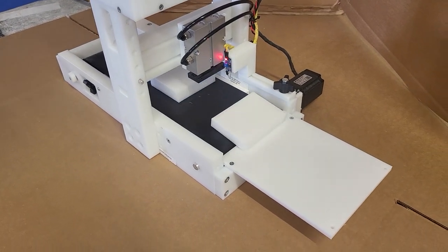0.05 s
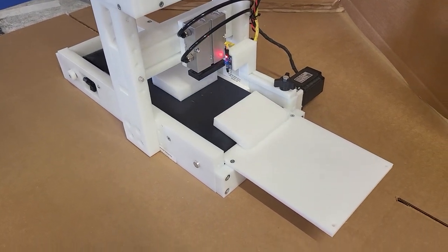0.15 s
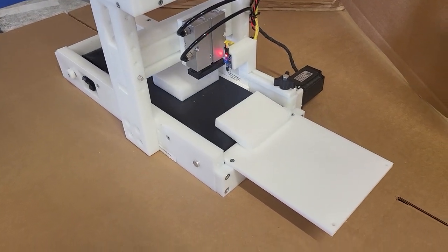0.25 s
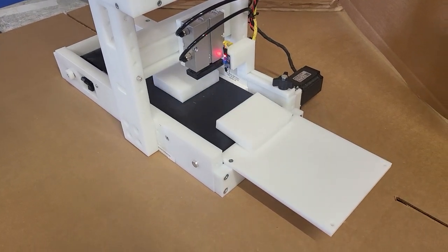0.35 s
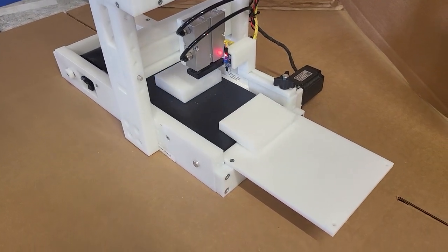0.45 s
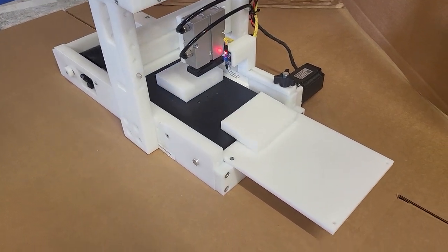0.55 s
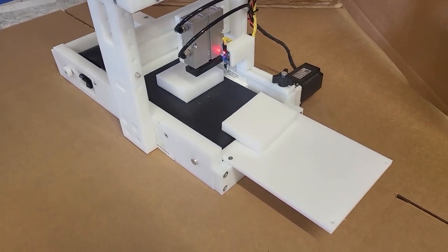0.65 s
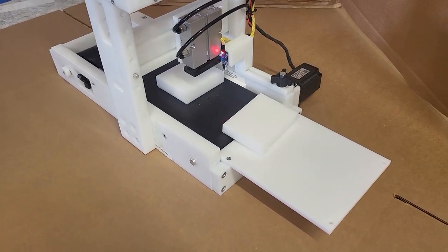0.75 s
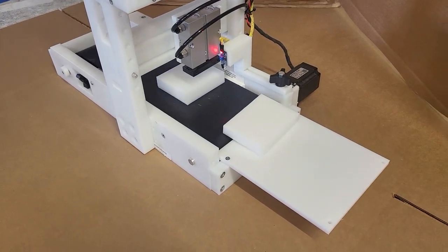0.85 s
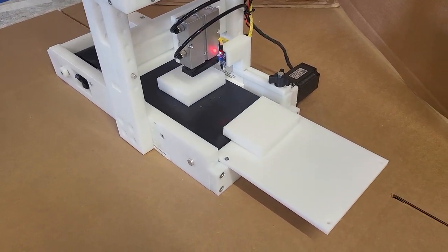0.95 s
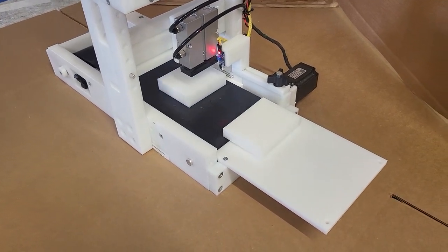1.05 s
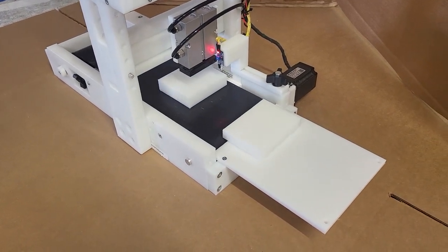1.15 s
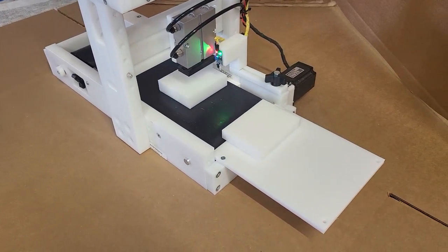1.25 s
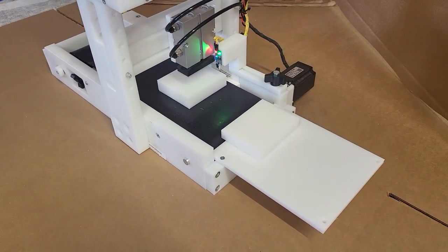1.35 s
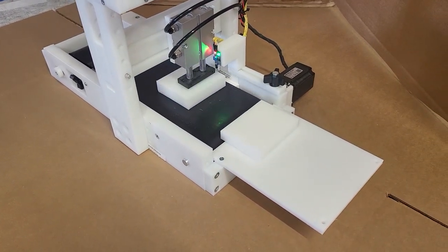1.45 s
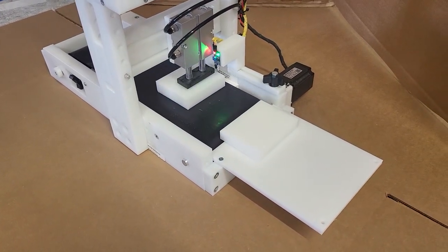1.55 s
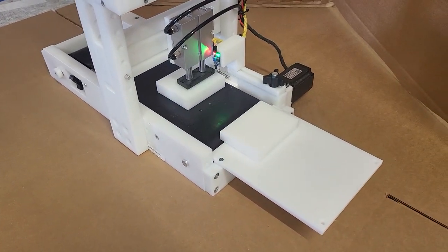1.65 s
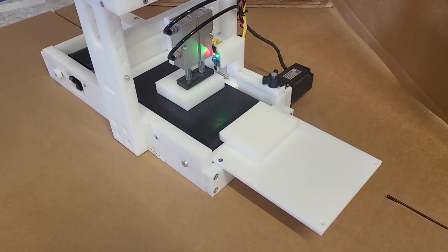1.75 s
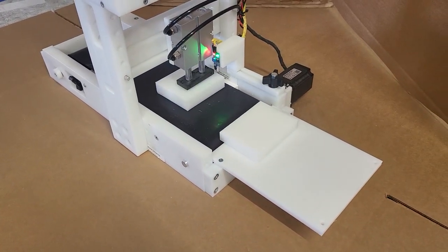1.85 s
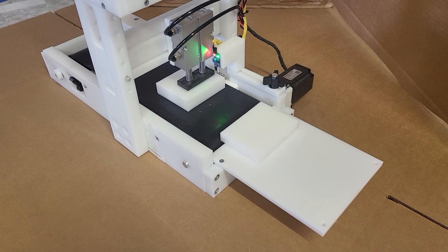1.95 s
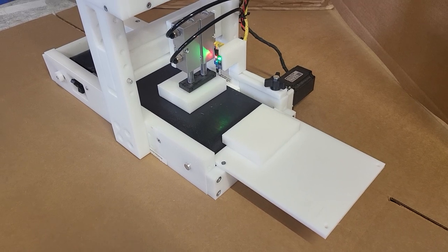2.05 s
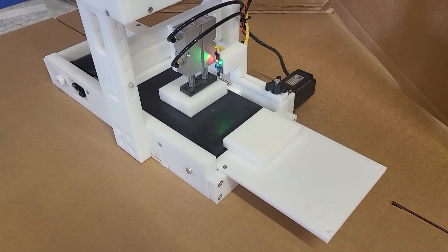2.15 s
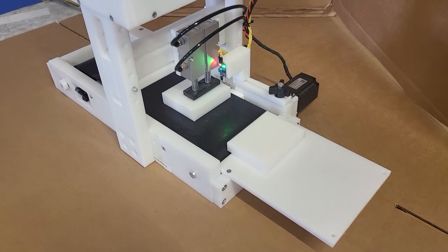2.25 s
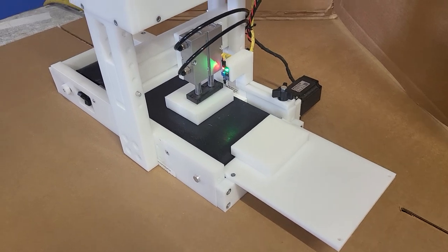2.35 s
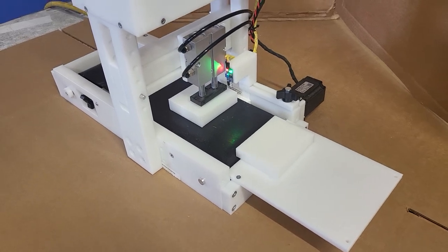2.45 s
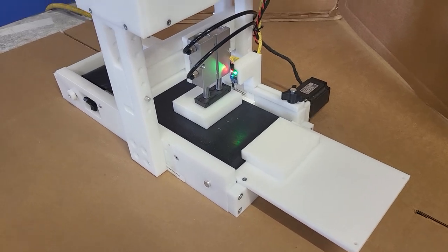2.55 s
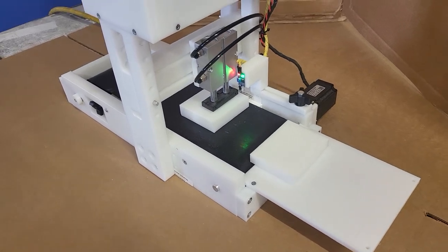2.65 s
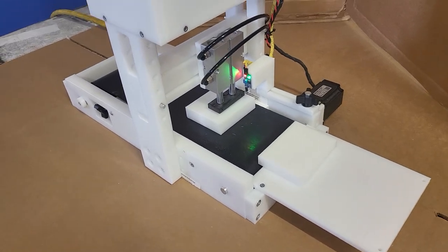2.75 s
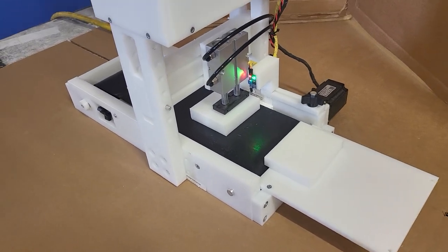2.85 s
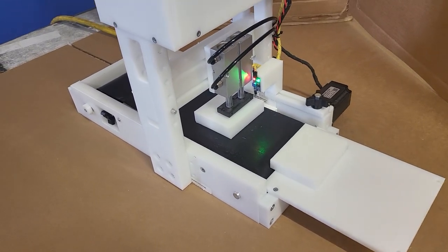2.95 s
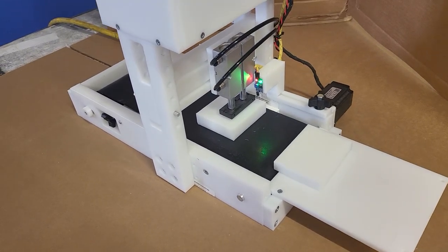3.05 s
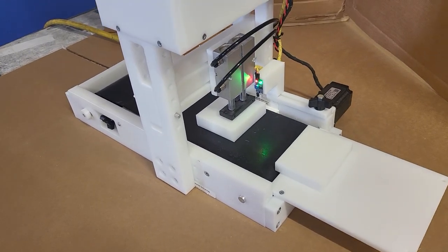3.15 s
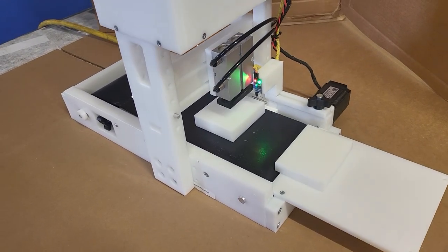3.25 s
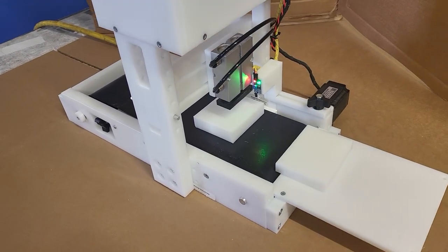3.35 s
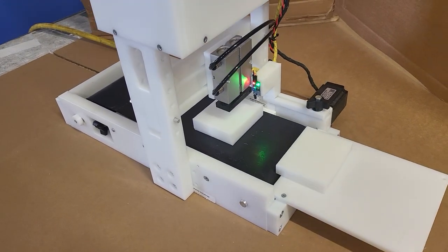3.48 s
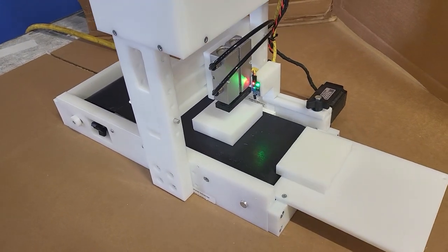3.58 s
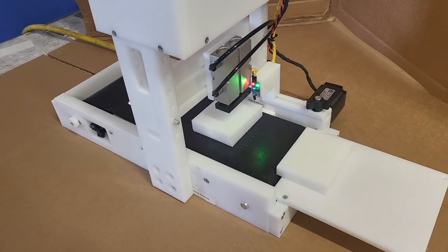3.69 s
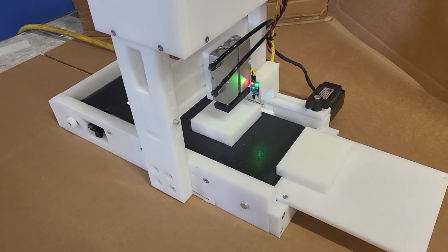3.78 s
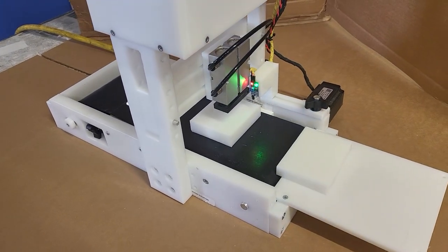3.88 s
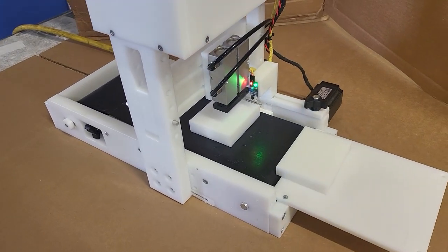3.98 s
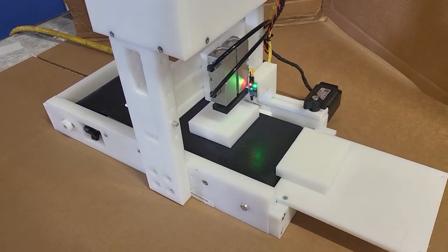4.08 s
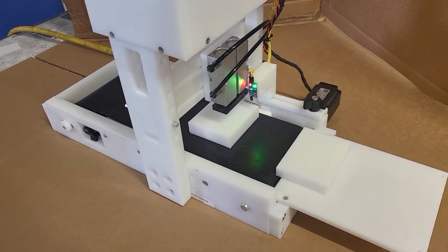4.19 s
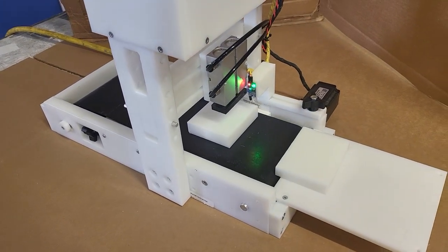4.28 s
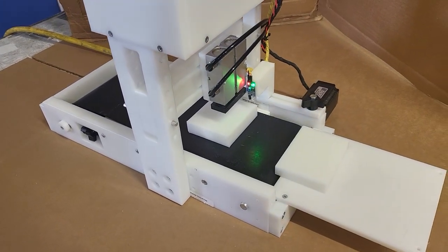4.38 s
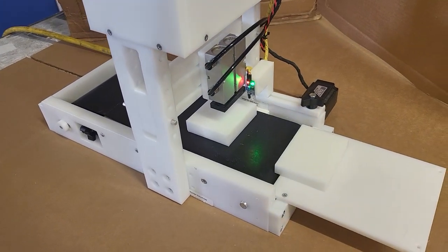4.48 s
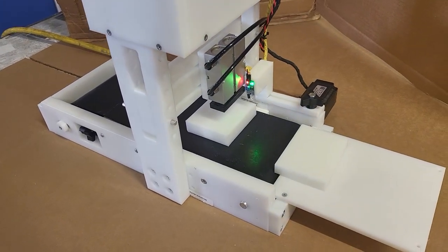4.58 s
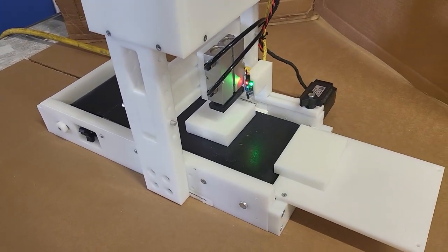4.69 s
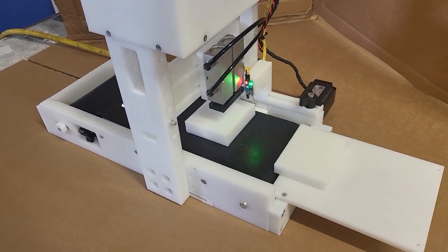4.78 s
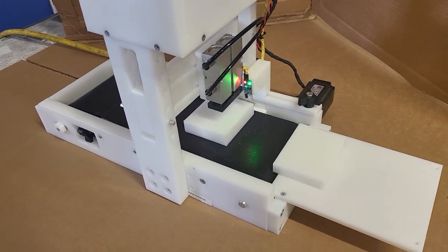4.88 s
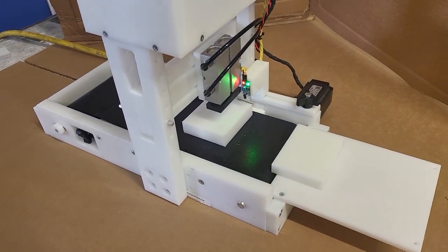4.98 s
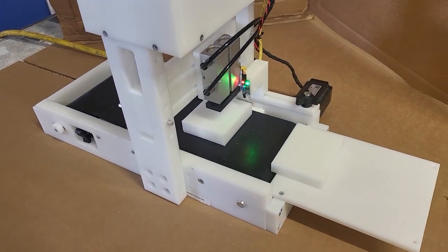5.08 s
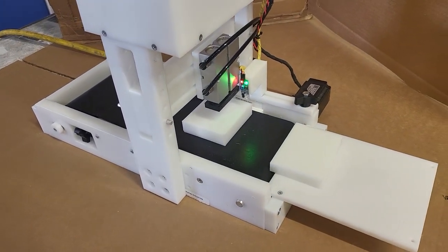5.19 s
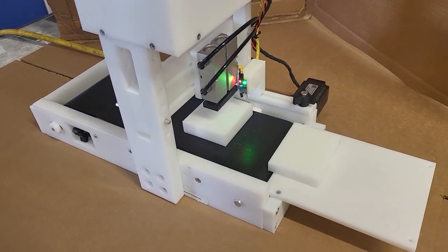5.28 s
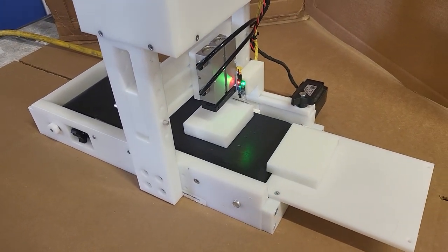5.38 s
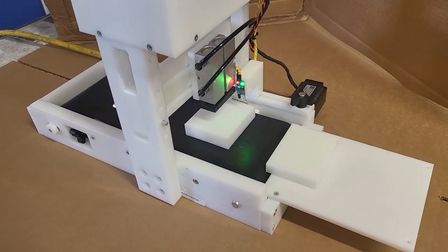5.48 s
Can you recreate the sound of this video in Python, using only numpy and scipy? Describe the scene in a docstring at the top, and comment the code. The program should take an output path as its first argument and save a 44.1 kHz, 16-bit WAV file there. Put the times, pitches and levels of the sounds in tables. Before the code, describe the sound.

Close stereo sound of a tabletop stamping machine: plastic clatter at once, belt whine and rub, then a stop. A hard pneumatic clack with an air burst follows, then hissing with a faint plastic tick or two, then a second thumping stroke as the piston returns. Thin air hiss, low hum and room rumble continue; the conveyor starts again softly. Short workshop echoes.

```python
"""Pneumatic stamping machine on a workshop table

A plastic block clatters onto the belt; its knocks are short noise bursts over ringing modes.
The conveyor, wavering tones over a rubbing noise, stops; a valve clicks and coloured noise blasts out.
The cylinder kicks and slams down, then back up: clacks and decaying modes; later the belt restarts.
An air leak hisses throughout, its colour turning as the listener moves, over hum, fan and room rumble.
"""
import sys
import numpy as np
from scipy import signal
from scipy.fft import rfft, irfft, next_fast_len
from scipy.io import wavfile

SR = 44100
rng = np.random.default_rng(int(sys.argv[2]) if len(sys.argv) > 2 else 0)


def generate_wav(signal):
    """Clip the signal to [-1, 1] and save it as 16-bit WAV at the path in sys.argv[1]."""
    frames = np.transpose(np.atleast_2d(signal))
    scaled = np.clip(frames, -1, 1) * 32767
    pcm = np.round(scaled).astype(np.int16)
    wavfile.write(sys.argv[1], SR, pcm)


N = 243866
TIME = np.arange(N) / SR


def amp(db):
    """Decibels to gain."""
    return 10 ** (np.asarray(db) / 20)


def unit(x):
    """Scales to rms 1."""
    return x / np.sqrt(np.mean(x ** 2) + 1e-20)


def read(points, hz):
    """Reads a curve on a log-frequency axis."""
    f, value = np.transpose(points)
    return np.interp(np.log(hz + 1), np.log(f + 1), value)


def add(mix, s, sound):
    """Mixes a sound in at time s, cut where the scene ends."""
    part = mix[:, max(round(s * SR), 0):][:, :sound.shape[-1]]
    part += sound[..., :part.shape[-1]]


def pan(db):
    """Left and right gains for a left-minus-right level difference."""
    return np.array([amp(db / 2), amp(-db / 2)]).reshape(2, -1)


def drift(per_s):
    """Slow random wander of rms 1, made by keeping only the lowest frequencies of noise."""
    hz = np.fft.rfftfreq(N, 1 / SR)
    return unit(irfft(rfft(rng.standard_normal(N)) * np.exp(-(hz / per_s) ** 2), N))


# How alike diffuse sound is in the two ears. Each row: frequency in Hz, likeness from 0 to 1.
EAR_LIKENESS = [(40, 0.83), (130, .97), (290, 0.72), (640, 0), (1400, 0), (16000, 0.26)]


def blend(a, b, hz):
    """Stereo spectrum from two independent ones, the right side sharing some of the left."""
    same = read(EAR_LIKENESS, hz)
    return np.array([a, same * a + np.sqrt(1 - same ** 2) * b])


def noise(spectrum):
    """Stereo noise of a given colour and rms 1, alike in both ears mostly in the bass."""
    size = next_fast_len(N)
    hz = np.fft.rfftfreq(size, 1 / SR)
    a, b = rfft(rng.standard_normal((2, size)))
    coloured = blend(a, b, hz) * amp(read(spectrum, hz))
    return unit(irfft(coloured, size)[:, :N])


def tones(lines, speed, waver, flutter):
    """Steady machine tones that waver a little in phase and strength."""
    out = np.zeros((2, N))
    wander, throb = drift(1), drift(3.5)
    for hz, db in lines:
        shift = rng.integers(N)  # each tone reads the shared wander from its own place
        phase = 2 * np.pi * (hz * speed * TIME + rng.random()) + waver * hz * np.roll(wander, shift)
        apart = np.arccos(read(EAR_LIKENESS, hz))
        wave = np.sqrt(2) * np.sin([phase, phase + apart])
        out += amp(db) * wave * (1 + flutter * np.roll(throb, shift))
    return out


def ring(modes, rise, spread, rattle=0., rattle_per_s=70):
    """Decaying modes, roughened where loose parts rattle; the higher ones differ more in phase between ears."""
    t = np.arange(SR * 3 // 4) / SR
    turn = rng.standard_normal((len(modes), 2, 1)) * spread
    smooth = np.exp(-(np.fft.fftfreq(len(t), 1 / SR) / rattle_per_s) ** 2)
    out = 0
    for (hz, db, t60), apart in zip(modes, turn):
        shake = np.fft.ifft(smooth * np.exp(2j * np.pi * rng.random(len(t))))
        swing = np.sqrt(1 - rattle ** 2) + rattle * shake / np.std(shake)
        phase = 2 * np.pi * hz * t + apart * min(hz / 1000, 1)
        out = out + amp(db - 60 * t / t60) * (swing * np.exp(1j * phase)).imag
    return out * (1 - np.exp(-t / rise))


def clack(centre_hz, octaves, decay, scatter=0.12, size=8192):
    """A push and the dense rattle after it, in one broad causal resonance."""
    t = np.arange(size) / SR
    hz = abs(np.fft.fftfreq(size, 1 / SR)) + 1
    hump = -2 * np.log1p((np.log2(hz / centre_hz) / octaves) ** 2 / 3)
    log_gain = hump - np.log1p((hz / centre_hz / 8) ** 2)
    resonance = np.exp(np.conj(signal.hilbert(log_gain)))  # minimum phase: nothing sounds before the push
    a, b = np.fft.fft(scatter * rng.standard_normal((2, size)) * np.exp(-t / decay))
    force = 1 + blend(a, b, hz / 2)  # the 1 is the push itself
    x = np.fft.ifft(force * resonance).real * (1 - t / t[-1]) ** 2
    return x * np.sqrt(decay * SR / np.sum(x ** 2) * 2)


def thump():
    """The short dull push of a part that jerks into motion."""
    return clack(centre_hz=186, octaves=0.39, decay=0.0015)


# How long the shop's tail rings. Each row: frequency in Hz, t60 in seconds.
SHOP_TAIL = [(60, 0.34), (150, 0.78), (400, 0.54), (1400, 0.66), (3000, 0.55), (7000, 0.55), (15000, 0.26)]


def workshop(x, near_db=-8.5, near_t60=0.099, far_db=-17.5, near_low_hz=900, far_low_hz=160):
    """Quick echoes off the table and cardboard, then the faint tail of the shop, all as decaying noise."""
    age = TIME[:SR]
    white = noise([(20, 0), (20000, 0)])[:, :SR]
    hz, t, z = signal.stft(white, SR, nperseg=256)
    z *= amp(-60 * t / read(SHOP_TAIL, hz)[:, None])
    far = signal.istft(z, SR, nperseg=256)[1][:, :SR] * np.clip(age / 0.037, 0, 1)
    near = rng.standard_normal((2, SR)) * amp(-60 * age / near_t60) * (age > .003)
    # small surfaces throw back little bass
    near = signal.sosfilt(signal.butter(2, near_low_hz, "high", fs=SR, output="sos"), near)
    far = signal.sosfilt(signal.butter(2, far_low_hz, "high", fs=SR, output="sos"), far)
    echoes = (amp(near_db) * unit(near) + amp(far_db) * unit(far)) / np.sqrt(SR)
    return x + signal.fftconvolve(x, echoes, axes=1)[:, :N]


# Colour of the room rumble. Each row: frequency in Hz, relative level in dB.
RUMBLE_COLOUR = [(15, -56.5), (25, -16), (65, -10), (120, -6), (147, -12), (188, -24.5), (371, -14),
                 (441, -19.5), (499, -18.5), (554, -27), (614, -22.5), (1600, -28.5), (2080, -70),
                 (3520, -120)]
RUMBLE_DB = -56


def room_rumble():
    """The low bed of the shop: steady noise weighted to the bass."""
    return amp(RUMBLE_DB) * noise(RUMBLE_COLOUR)


# Transformer hum. Each row: frequency in Hz, level in dB.
MAINS_TONES = [(119.95, -51.5), (240, -72)]
# Fan tones. Each row: frequency in Hz, level in dB before the flutter.
FAN_TONES = [(358, -68), (385, -65.5), (500, -75), (622, -77)]


def hum():
    """Nearly steady mains hum and a fan whose tones waver strongly in level."""
    mains = tones(MAINS_TONES, 1, waver=.0003, flutter=.04)
    return mains + tones(FAN_TONES, 1, waver=0.0006, flutter=0.79)


# The listener moving round the machine. Each row: time in seconds, share of the whole way.
LISTENER_WAY = [(0, 0), (1.5, 0.1), (2.2, 0.34), (3.1, 0.53), (4.0, 1), (5.5, 0.99)]
# Colour of the escaping air. Each row: frequency in Hz, relative level in dB.
LEAK_COLOUR = [(900, -21.5), (1500, -16.5), (2200, -10.5), (3050, -12), (3550, -5), (4600, -6), (5750, -2),
               (7000, -2), (7950, 1), (8480, -7), (10500, -5.5), (13000, -7.5), (15600, -7), (16300, -28)]
# Balance of the hiss. Each row: frequency in Hz, left-minus-right level in dB.
LEAK_BALANCE = [(60, -2), (110, -3.5), (200, 2), (380, -1.5), (700, -2), (1290, 0.5), (2380, 1.5),
                (4400, -3), (8120, -2), (15000, -2)]
# Beamed resonances of the leak. Each row: frequency on the beam in Hz, boost on the beam in dB,
# direction as a share of the way, left-minus-right boost in dB.
LEAK_BEAMS = [(5950, 3, 0.65, -6), (6920, 6.5, .1, 8.5), (7520, 7.5, 0.55, 0), (7960, 6, 0.035, -1.5),
              (10130, 3.5, 0.07, -10.5), (14700, 2.5, .95, 11)]
# How much sooner the hiss is heard on the right, at the start and the end of the way [s].
LEAK_RIGHT_LEADS = [0.00013, -.00017]
LEAK_DB = -44.5
LEAK_DIRECT = 0.092  # share of the hiss that reaches both ears straight
BEAM_SPREAD, BEAM_WIDTH = 0.25, 0.025  # share of the way; share of each resonance's frequency
BEAM_GLIDE = 0.12  # rise across a beam, as a share of its frequency per whole way


def leak(echo=0.17, swing=0.246, count=6):
    """Escaping air; the moving listener passes through its beams, and echoes off the frame comb the hiss."""
    hz, t, z = signal.stft(rng.standard_normal((2, N)), SR, nperseg=512)
    hz = hz[:, None]
    way = np.interp(t, *np.transpose(LISTENER_WAY))
    lead = np.interp(way, [0, 1], LEAK_RIGHT_LEADS)
    straight = LEAK_DIRECT * z[0] * np.exp(2j * np.pi * hz * lead)
    z[1] = straight + np.sqrt(1 - LEAK_DIRECT ** 2) * z[1]
    z *= amp(read(LEAK_COLOUR, hz)) * pan(read(LEAK_BALANCE, hz[:, 0]))[:, :, None]
    for centre_hz, db, direction, side_db in LEAK_BEAMS:
        off_beam = way - direction
        facing = np.exp(-(off_beam / BEAM_SPREAD) ** 2)
        peak = np.exp(-((hz / centre_hz - 1 - BEAM_GLIDE * off_beam) / BEAM_WIDTH) ** 2)
        z *= amp(np.multiply.outer([db + side_db / 2, db - side_db / 2], facing * peak))
    for side in z:
        delays = np.geomspace(.0005, .003, count) * rng.uniform(.8, 1.2, count)
        slides = swing * rng.standard_normal(count)  # each delay stretches or shrinks along the way
        comb = 1
        for delay, slide in zip(delays, slides):
            comb = comb + echo * np.exp(2j * np.pi * hz * delay * (1 + slide * way))
        side *= abs(comb)
    return amp(LEAK_DB) * unit(signal.istft(z, SR, nperseg=512)[1][:, :N])


# Conveyor runs. Each row: start in seconds, stop in seconds, level in dB, motor speed as a factor.
CONVEYOR_RUNS = [(-.1, 1.29, 0, 1.0), (5.112, 5.7, -4, 1)]
# Motor whine. Each row: frequency in Hz at speed 1, level in dB before the run's level.
MOTOR_TONES = [(178, -64), (648, -61.5), (1268, -69), (1360, -70.5), (1445, -64.5), (1896, -68.5),
               (2622, -72)]
# Colour of the belt's rub. Each row: frequency in Hz, relative level in dB.
BELT_COLOUR = [(100, 7.5), (180, 2.5), (450, 1), (650, 5), (1000, -3.5), (1450, -3), (3000, -22),
               (5000, -9)]
BELT_DB = -57.5  # before the run's level


def conveyor():
    """The motor whines and the belt rubs, fading in and out at the ends of each run."""
    out = np.zeros((2, N))
    rub = amp(BELT_DB) * noise(BELT_COLOUR)
    for start, stop, db, speed in CONVEYOR_RUNS:
        running = np.clip(np.minimum(TIME - start, stop - TIME) / 0.098, 0, 1)
        whine = tones(MOTOR_TONES, speed, waver=0.00018, flutter=0.06)
        out += amp(db) * running * (rub + whine)
    return out


# Light plastic knocks. Each row: start in seconds, ring level in dB, tick level in dB,
# tick centre in Hz, tick spread in octaves, tick decay in seconds.
PLASTIC_KNOCKS = [(.0045, -34.5, -33, 1210, 0.79, 0.011), (.024, -37, -39.5, 480, 0.69, 0.010),
                  (.069, -35.5, -40, 1200, 0.28, 0.01), (2.152, -69, -41, 1230, 0.54, .0035),
                  (2.505, -74, -60.5, 1220, .6, 0.06)]
# Modes of the plastic block. Each row: frequency in Hz, relative level in dB, t60 in seconds.
BLOCK_MODES = [(191, -6.5, 0.069), (263.3, -12, 0.24), (351, -7.5, 0.25), (409, -7.5, 0.43),
               (649, -6.5, 0.45), (1030, -14, .11), (1056, 0.5, 0.1), (1230, -6, 0.083), (1268, 3, 0.11),
               (2196, -14, 0.11), (2535, -8, 0.082), (3080, -9, 0.06)]


def knocks():
    """Light plastic parts tick and ring: a noisy clack over the block's rattling modes."""
    out = np.zeros((2, N))
    for s, ring_db, tick_db, hz, octaves, decay in PLASTIC_KNOCKS:
        add(out, s, amp(ring_db) * ring(BLOCK_MODES, rise=0.00044, spread=1.0, rattle=0.67))
        add(out, s, amp(tick_db) * clack(hz, octaves, decay))
    return out


def jet(port, lead, direct=0.14):
    """Air noise from one port: part goes straight to both ears, one a moment before the other."""
    left, right = noise(port)
    straight = direct * np.interp(TIME + lead, TIME, left)
    return np.array([left, straight + np.sqrt(1 - direct ** 2) * right])


# Solenoid valve switching. Each row: start in seconds, air spit level in dB, decay of spit and click
# in seconds, click level in dB, spool thump level in dB.
VALVE_SWITCHES = [(1.3767, -23.5, 0.014, -29, -43), (3.1831, -23, 0.02, -37.5, -22)]
# Exhaust blasts, one a stroke. Each row: opening in seconds, opening time in seconds, piston arrival
# in seconds, level in dB, sag by arrival in dB, emptying time in seconds, left-minus-right level in dB
# (of spit and blast).
EXHAUST_BLASTS = [(1.3852, 0.0064, 1.436, -15, -1.5, 0.0073, -2),
                  (3.196, .003, 3.275, -13.9, -3.8, 0.0076, -1)]
# Port that vents on the down stroke. Each row: frequency in Hz, relative level in dB.
DOWN_PORT = [(180, -37.5), (300, -0.5), (611, -9), (746, -19), (1000, -9), (1130, -17), (2380, -14),
             (5010, -6.5), (6970, -8.5), (7580, -4), (8940, -11), (9710, -3), (15700, -5.5)]
# Port that vents on the return. Each row: frequency in Hz, relative level in dB.
RETURN_PORT = [(180, -42), (300, -7), (439, -11.5), (527, -18), (632, -27), (1520, -27.5), (1820, -15),
               (1980, -25.5), (3480, -9), (5350, -9.5), (5810, -6), (7900, -4), (9000, -8.5), (15700, -3.5)]
# How much sooner each port is heard on the right [s].
PORT_RIGHT_LEADS = [6 / SR, -2 / SR]


def exhaust():
    """The valve clicks; air then roars from one port until the piston arrives and the chamber empties."""
    out = np.zeros((2, N))
    strokes = zip(VALVE_SWITCHES, EXHAUST_BLASTS, (DOWN_PORT, RETURN_PORT), PORT_RIGHT_LEADS)
    for switch, blast, port, lead in strokes:
        s, spit_db, decay, click_db, spool_db = switch
        opens, opening, arrives, blast_db, sag_db, emptying, side_db = blast
        spit = np.clip((TIME - s) / 0.0014, 0, 1) * np.exp(-np.maximum(TIME - s - .003, 0) / decay)
        travel = np.clip((TIME - opens) / (arrives - opens), 0, 1)
        flow = np.clip((TIME - opens) / opening, 0, 1) * amp(sag_db * travel)
        flow *= np.exp(-np.maximum(TIME - arrives, 0) / emptying)
        out += jet(port, lead) * (amp(spit_db) * spit + amp(blast_db) * flow) * pan(side_db)
        add(out, s, amp(click_db) * clack(centre_hz=2520, octaves=0.54, decay=decay))
        add(out, s, amp(spool_db) * thump())
    return out


# The piston breaks loose, kicking the frame back. Each row: start in seconds, thump level in dB,
# knock level in dB, frame sway level in dB.
PISTON_KICKS = [(1.3848, -17.5, -30, -28), (3.1953, -13.5, -14.5, -34.5)]
# The piston slams into the end of its travel. Each row: start in seconds, knock level in dB,
# panel ring level in dB, barrel ring level in dB.
PISTON_SLAMS = [(1.4232, -18, -30.5, -33), (3.2618, -18.5, -41, -25.5)]
# The frame takes the load and jolts on the table. Each row: start in seconds, sway level in dB,
# thud centre in Hz, panel ring level in dB.
FRAME_JOLTS = [(1.4037, -22, 370, -31), (1.4287, -18.5, 260, -27), (1.4658, -31, 260, -35.5),
               (3.274, -21.5, 200, -39.5)]
# The whole frame rocking on the table. Each row: frequency in Hz, relative level in dB, t60 in seconds.
FRAME_MODES = [(53.3, -12, 0.42), (81.7, 4.5, 0.2), (105.3, -12, 0.34), (159, -8.5, 0.26)]
# Plastic panels of the base. Each row: frequency in Hz, relative level in dB, t60 in seconds.
PANEL_MODES = [(175.3, -5, 0.28), (254, -0.5, 0.19), (341, -16, 0.39), (367, 0.5, 0.21), (409, -4, 0.38),
               (584.4, 5, 0.11), (656, -4, 0.11), (800, -33, 0.14), (1004, -3, 0.11)]
# Metal barrel and its end stop. Each row: frequency in Hz, relative level in dB, t60 in seconds.
BARREL_MODES = [(645, 0.5, 0.17), (709.6, 1, 0.16), (768, 1, .12), (1000, -7, 0.13), (1080, -7, 0.067),
                (1387, -6, .24), (1463, 3.5, 0.074), (1850, -14, .1), (2310, -18, 0.11), (2640, -10, 0.12),
                (2730, -15, 0.14), (2906, -4, 0.051)]
THUMP_LAG_S, KICK_BARREL_DB = 0.0016, -38  # the thump follows the knock; every kick rings the barrel lightly
CRACK_DB, CRACK_LAG_S = -1, .0008  # the bright crack of a slam against its knock
THUD_DB = -9.5  # thud of a jolt against its sway
BARREL_RATTLE = .7  # share of the barrel's ring that is shaken by loose fittings


def cylinder():
    """Each stroke kicks off, slams into its end and jolts the frame; barrel, panels and frame ring on."""
    out = np.zeros((2, N))
    frame = ring(FRAME_MODES, rise=0.0022, spread=1.1)
    panels = ring(PANEL_MODES, rise=0.0002, spread=1.93, rattle=0.73, rattle_per_s=33)
    barrel = ring(BARREL_MODES, rise=0.00056, spread=1.0, rattle=BARREL_RATTLE)
    for s, thump_db, knock_db, sway_db in PISTON_KICKS:
        add(out, s, amp(knock_db) * clack(centre_hz=808, octaves=0.29, decay=0.0025))
        add(out, s + THUMP_LAG_S, amp(thump_db) * thump())
        add(out, s, amp(KICK_BARREL_DB) * barrel - amp(sway_db) * frame)  # minus: the frame recoils
    for s, db, panel_db, barrel_db in PISTON_SLAMS:
        crack = clack(centre_hz=1800, octaves=0.9, decay=0.0088, scatter=0.29)
        add(out, s, amp(db) * clack(centre_hz=765, octaves=0.43, decay=0.0081))
        add(out, s + CRACK_LAG_S, amp(db + CRACK_DB) * crack)
        add(out, s, amp(panel_db) * panels + amp(barrel_db) * barrel)
    for s, sway_db, hz, panel_db in FRAME_JOLTS:
        add(out, s, amp(sway_db + THUD_DB) * clack(hz, octaves=0.64, decay=0.021))
        add(out, s, amp(sway_db) * frame + amp(panel_db) * panels)
    return out


def scene():
    """The machine's strokes and knocks echo in the workshop, over rumble, hum, leak and conveyor."""
    steady = room_rumble() + hum() + leak() + conveyor()
    return workshop(knocks() + exhaust() + cylinder()) + steady


EDGE_HZ = 15840  # upper band limit


def record(dry):
    """The microphone sheds the lowest rumble; a steep low-pass then limits the band."""
    thinned = signal.sosfilt(signal.butter(2, 38, "high", fs=SR, output="sos"), dry)
    low_pass = signal.firwin(1023, EDGE_HZ, window=("kaiser", 8), fs=SR)
    return signal.oaconvolve(thinned, low_pass[None], "same")


dry = scene()
out = record(dry)
generate_wav(out)
```